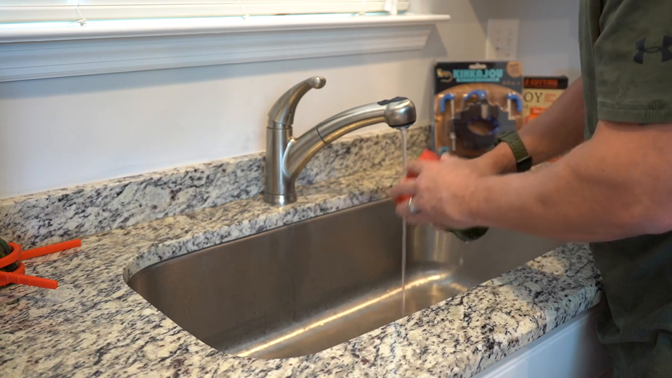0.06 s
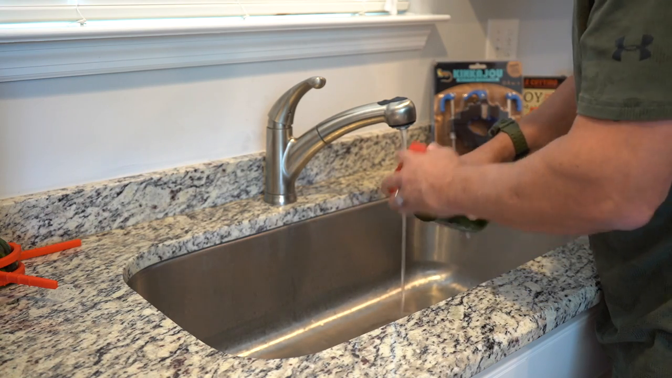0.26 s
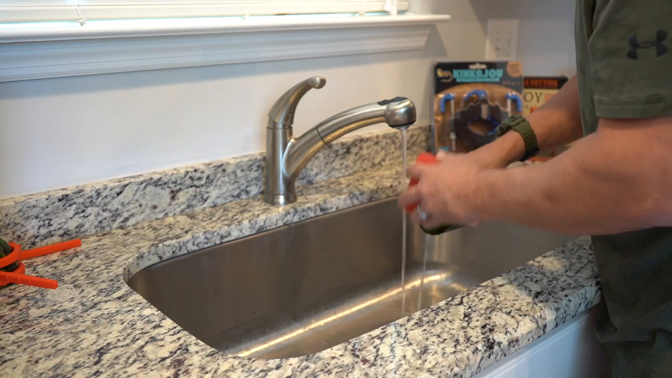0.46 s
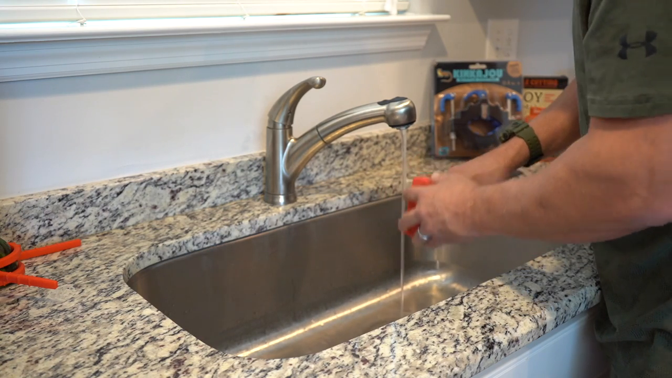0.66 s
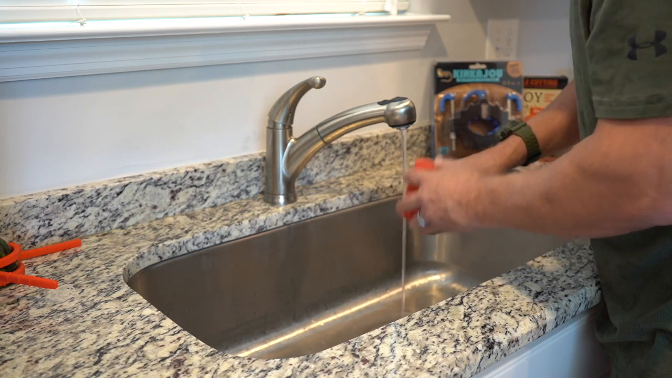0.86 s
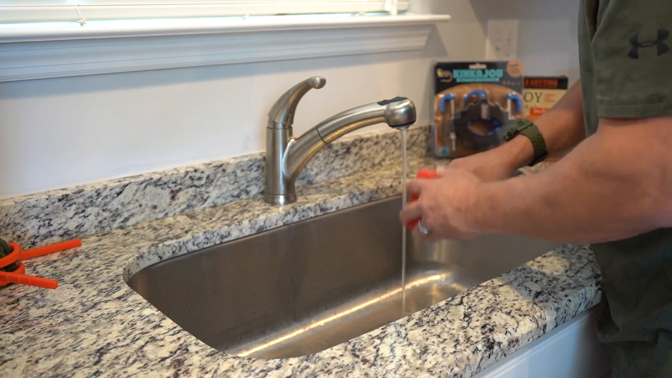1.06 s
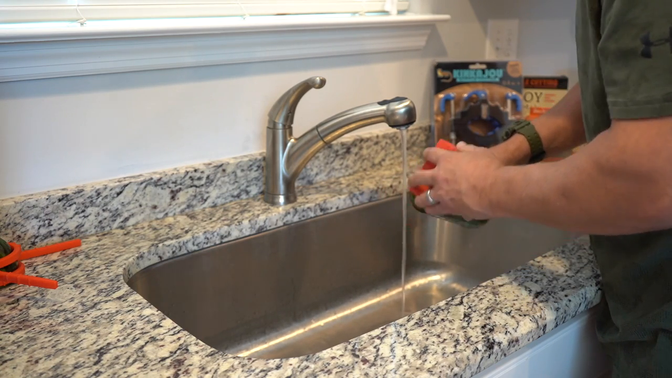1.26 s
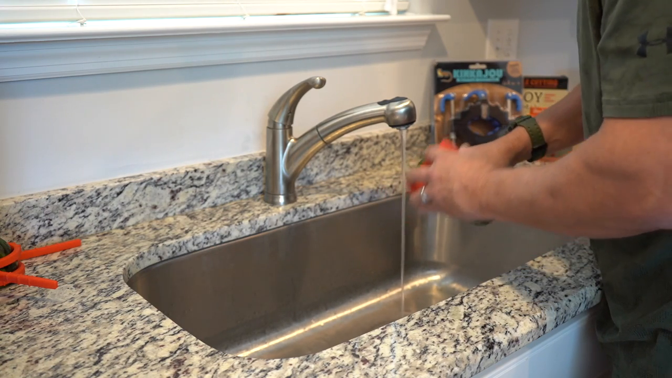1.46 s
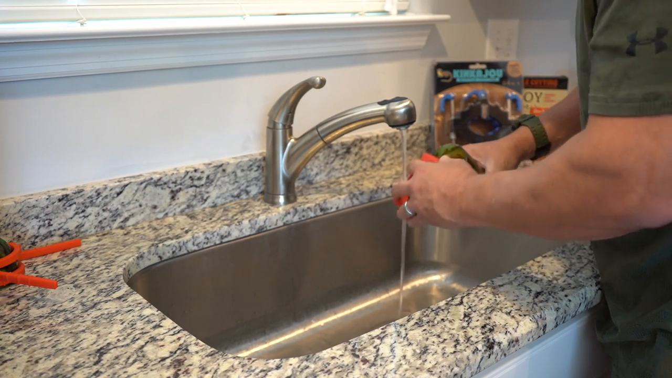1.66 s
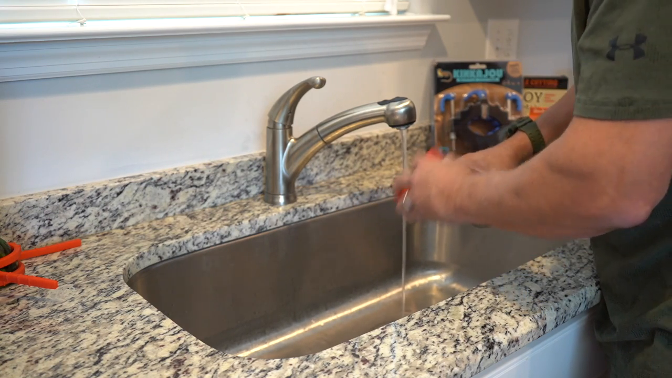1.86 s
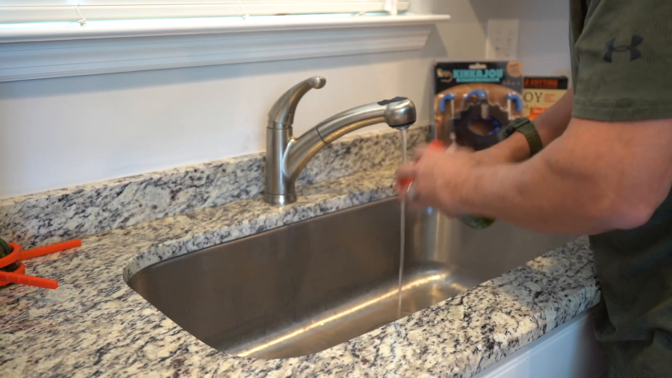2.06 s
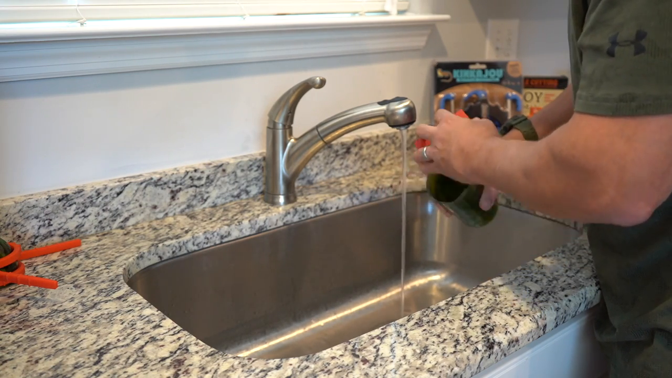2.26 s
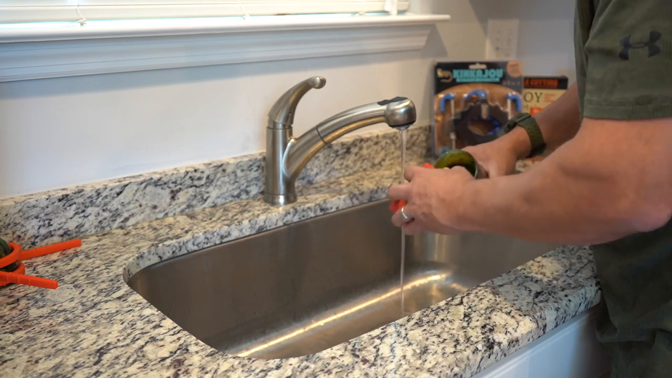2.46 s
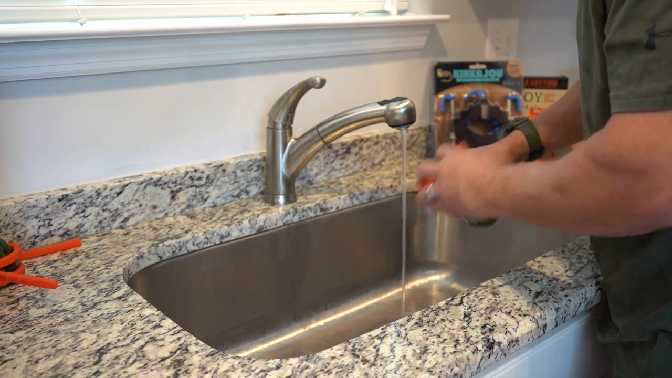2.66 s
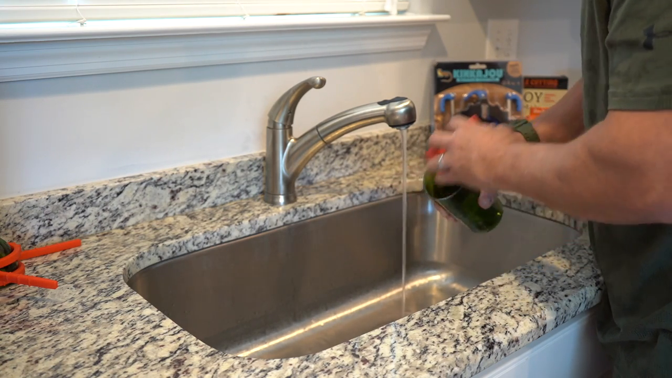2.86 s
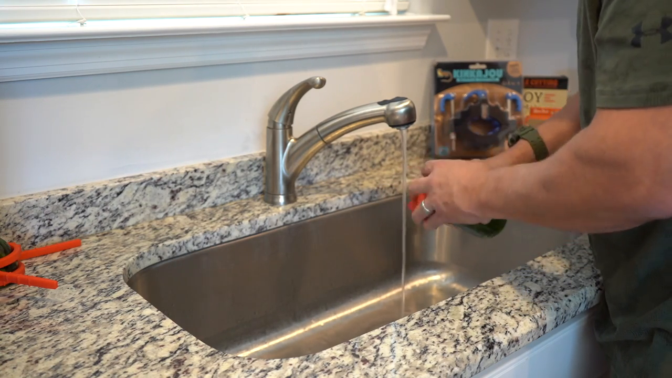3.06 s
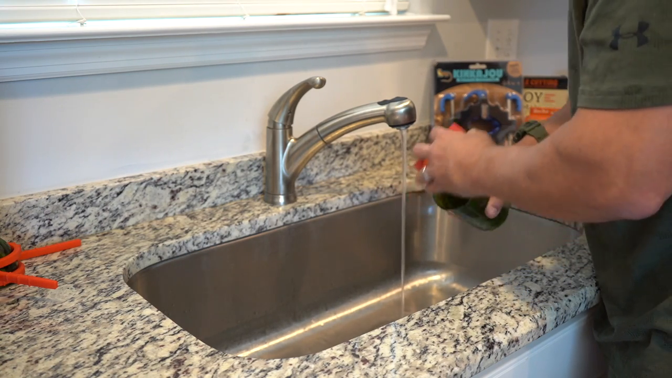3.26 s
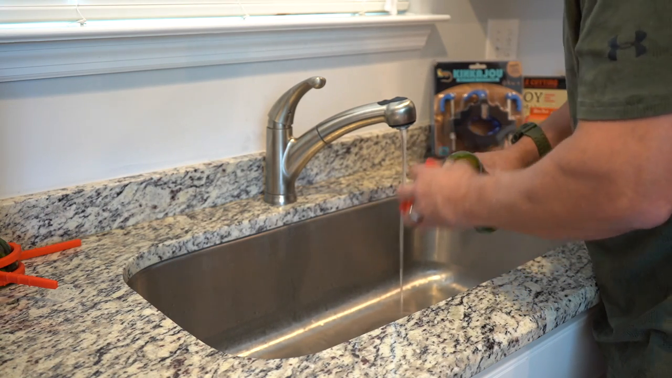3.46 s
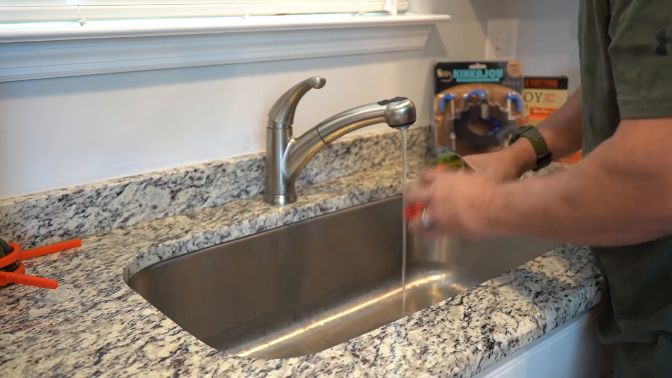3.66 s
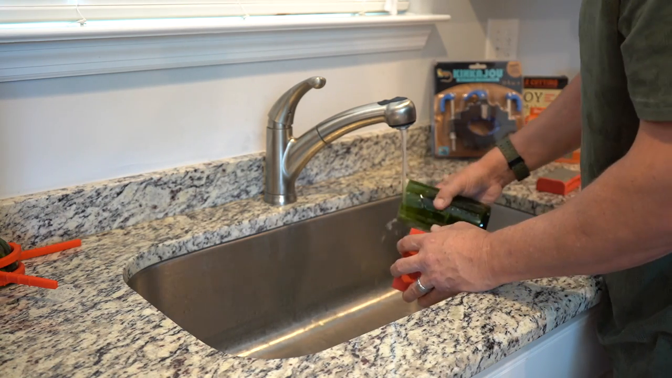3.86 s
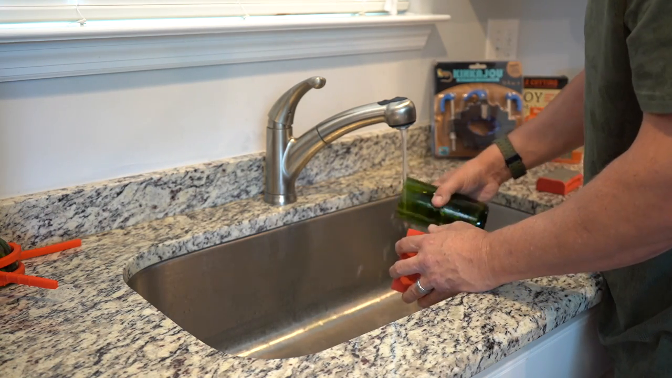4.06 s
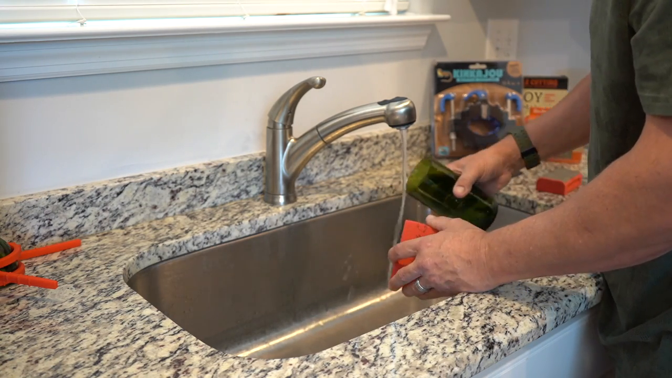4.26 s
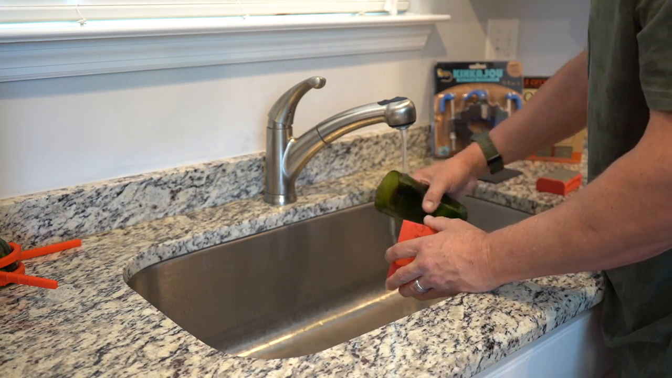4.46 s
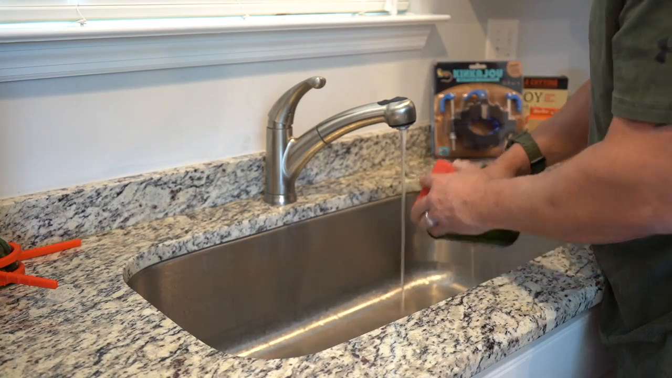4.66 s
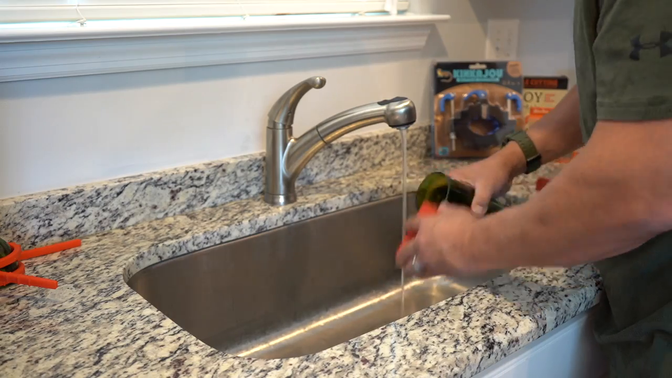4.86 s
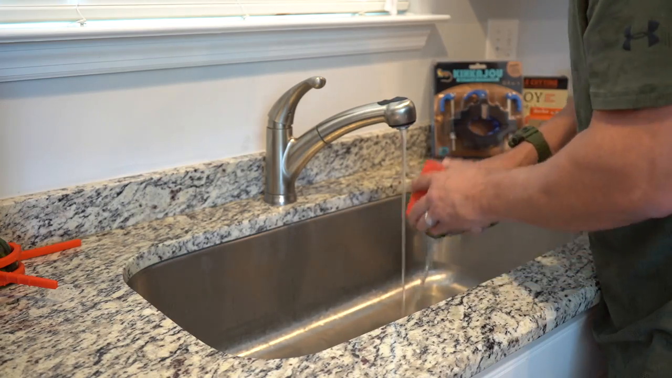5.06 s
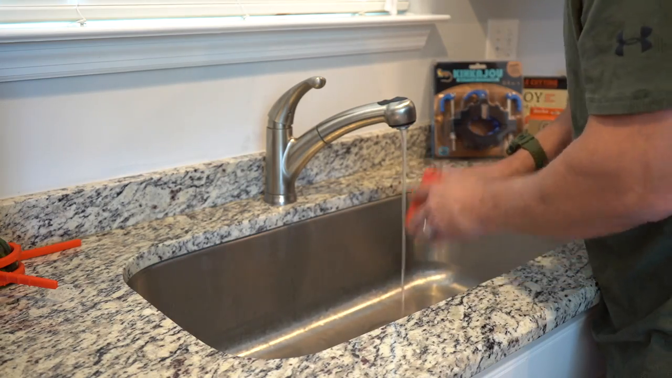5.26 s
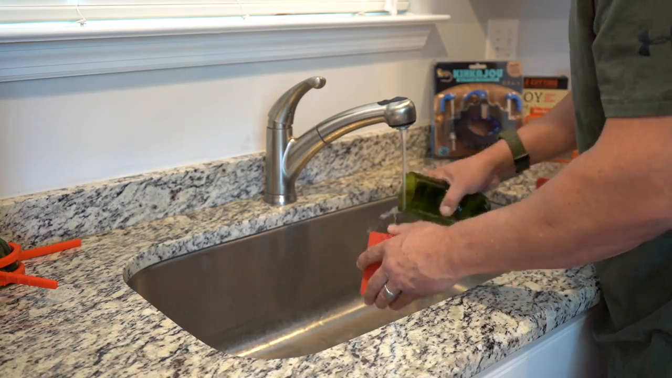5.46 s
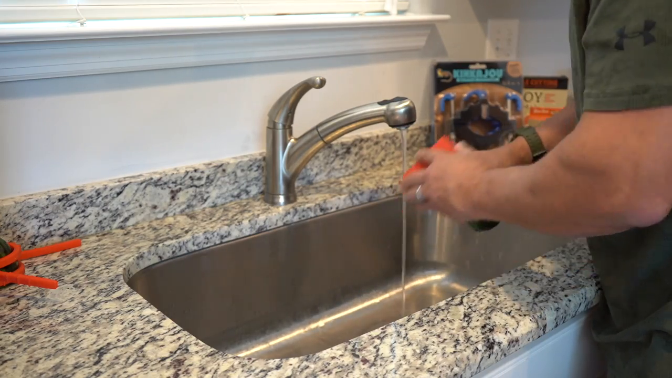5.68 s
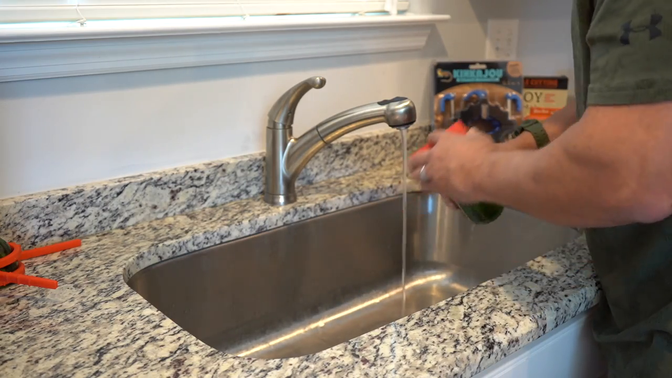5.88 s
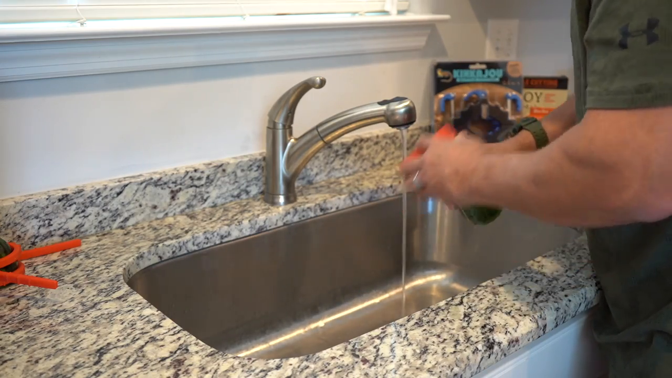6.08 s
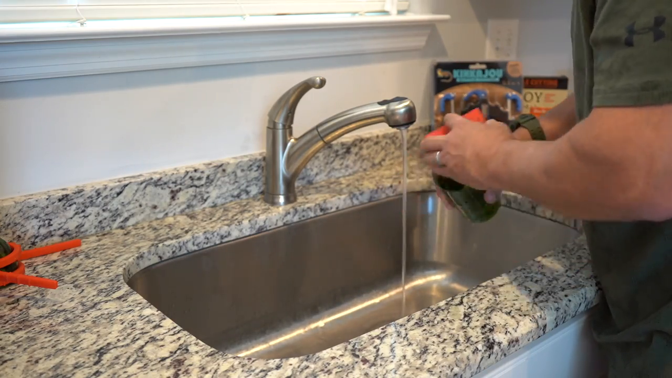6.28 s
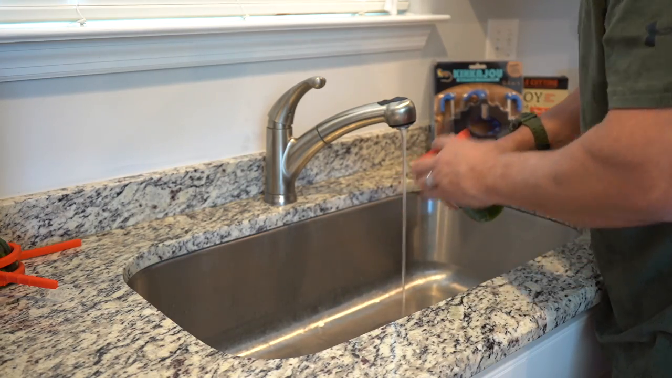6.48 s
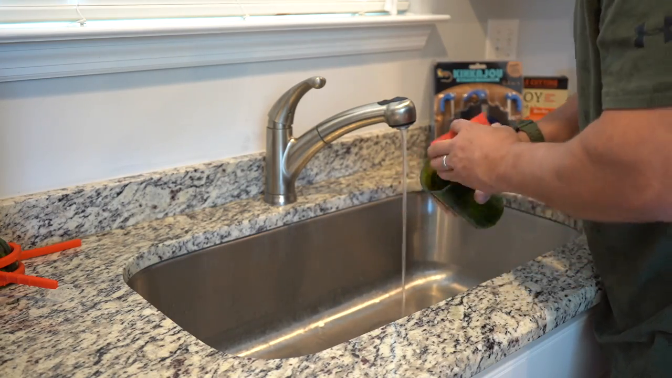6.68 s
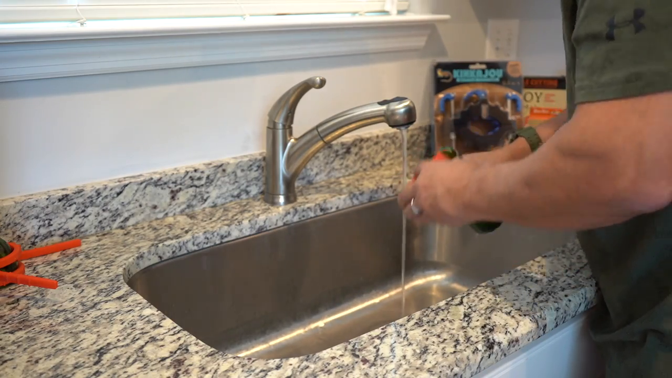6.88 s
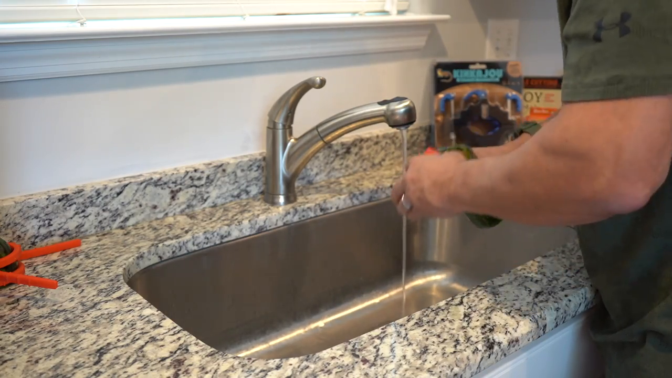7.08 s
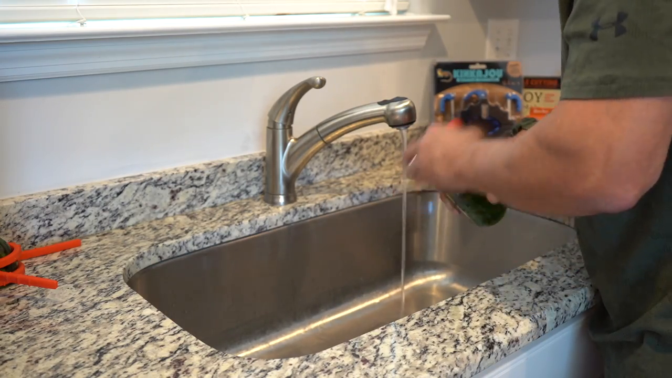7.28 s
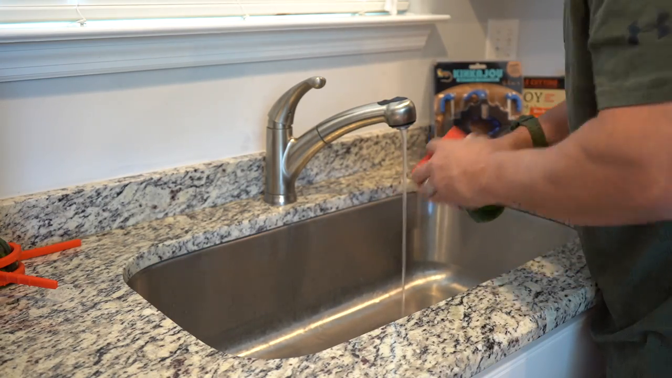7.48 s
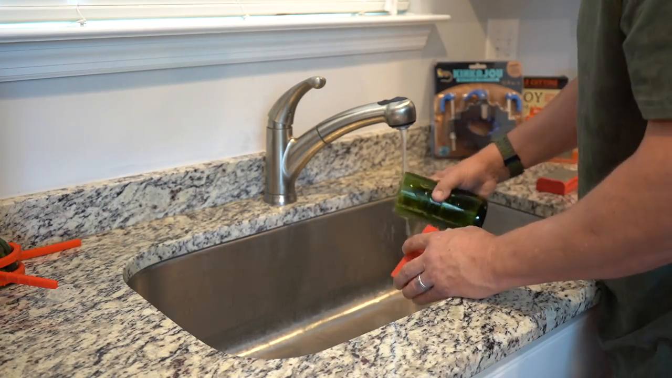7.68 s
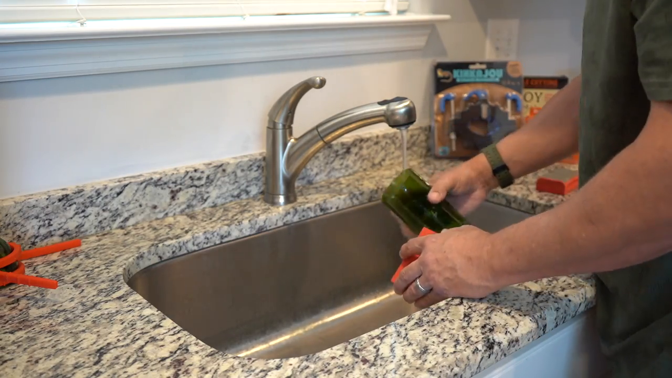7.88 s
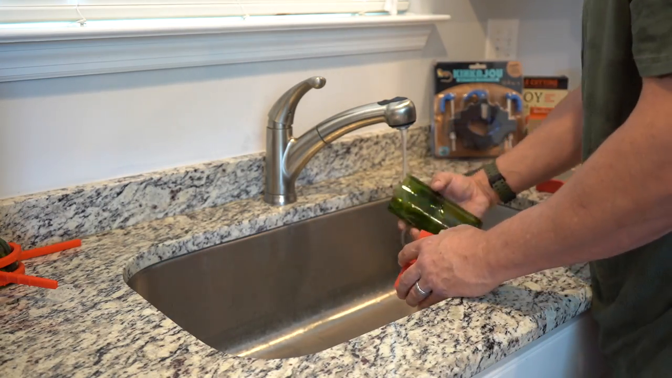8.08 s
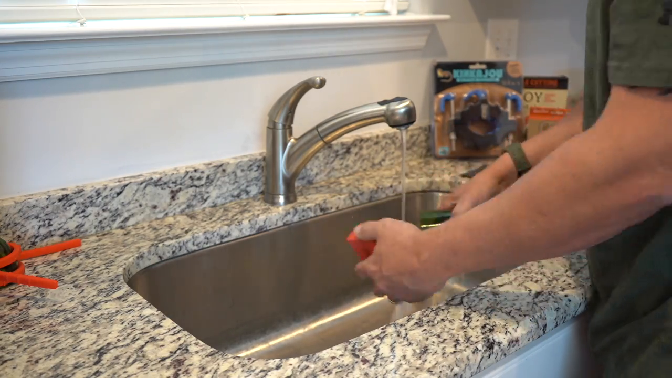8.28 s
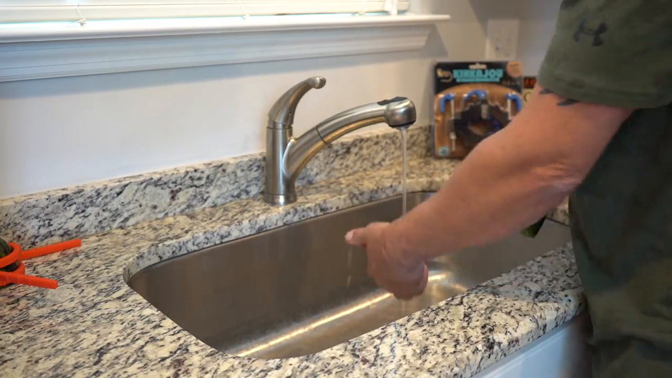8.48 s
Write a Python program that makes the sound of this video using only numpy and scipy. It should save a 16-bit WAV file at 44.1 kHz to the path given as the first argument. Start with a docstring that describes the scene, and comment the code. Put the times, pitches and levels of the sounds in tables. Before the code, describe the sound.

A close, fairly dry stereo sound at a kitchen sink, with faint low hum and room rumble throughout. A brief fuller splash of water opens it, and from about 0.1 s a wet diamond pad grinds a glass bottle rim: bright, hissy grit in a rapid judder of 30 to 44 pulses a second, with a wavering mid-high ring. Squawks stand out near 0.2, 1.0-1.3 and 2.5-3.2 s, and a knock at 3.3. At 3.75 the rasp stops; the stream swells, drumming on the steel basin, with low gulping splats and crisp drops until 4.7. Short scrapes come at 4.75-4.95 and 5.1-5.35, with water running between and a small pour at 5.5. Sanding resumes at 5.6 with a sharp squawk at 5.8, slowing slightly, with more squeaks near 7.5. It ends at 7.6; louder water drums, then heavy splats and bright droplet bursts at 8.25-8.4.

```python
"""A faint hum, a room rumble and a thin stream drumming on a steel sink are heard throughout.
Soon a wet diamond pad grinds the cut rim of a glass bottle: it sticks and slips 30 to 44 times a second,
its grit chips rasp through the bottle's resonances, and the rim's oval mode sings, scrapes and squawks.
Between strokes, when the bottle is rinsed, the stream swells; water splats on the basin and drops burst.
Noise, random clicks and gliding tones are shaped by resonances, spectra and envelopes."""
import sys
import numpy as np
from scipy import signal
from scipy.fft import rfft, irfft, next_fast_len
from scipy.io import wavfile
from scipy.ndimage import uniform_filter1d

SR = 44100
rng = np.random.default_rng(int(sys.argv[2]) if len(sys.argv) > 2 else 0)


def to_wav(sig):
    """Store sig (one row per channel, or 1-D mono) as 16-bit WAV at the path in sys.argv[1].

    Samples outside -1..1 are clipped; the rate is SR.
    """
    pcm = np.clip(np.atleast_2d(sig), -1, 1) * 32767
    pcm = np.round(pcm).astype(np.int16)
    wavfile.write(sys.argv[1], SR, pcm.T)  # frames by channels


N = 376160
TIME = np.arange(N) / SR


def from_db(db):
    """Level to amplitude: 20 dB is a factor of ten."""
    return 10 ** (np.asarray(db) / 20)


def rms_one(x):
    """Normalise to unit effective (root-mean-square) amplitude."""
    return x / np.sqrt(np.mean(abs(x) ** 2) + 1e-20)


def in_time(rows):
    """Linear interpolation: each column of a curve at every sample."""
    s, *columns = np.transpose(rows)
    return [np.interp(TIME, s, c) for c in columns]


def at_hz(points, hz):
    """Interpolate a spectrum on a log-frequency axis."""
    f, value = np.transpose(points)
    return np.interp(np.log(np.maximum(hz, 1)), np.log(f), value)


def filtered(x, order, hz, kind="low"):
    """A Butterworth filter: maximally flat in its passband."""
    return signal.sosfilt(signal.butter(order, hz, kind, fs=SR, output="sos"), x)


def drift(rate):
    """Low-passed noise: smooth chance of spread 1 with about `rate` turns a second."""
    step = 40  # samples between slow values
    r = np.exp(-2 * step * np.pi * rate / SR)
    noise = rng.standard_normal(N // step + 2002)
    slow = signal.lfilter([1], [1, -2 * r, r * r], noise)[2000:]  # skip the filter's start
    return np.interp(np.arange(N) / step, np.arange(len(slow)), rms_one(slow))


def grains(per_s, spread_db):
    """Random impulse process: two unrelated trains of clicks of uneven size and random sign; rms 1."""
    size_db = spread_db * np.minimum(rng.exponential(1, (2, N)), 4)
    sizes = from_db(size_db) * rng.choice([-1, 1], (2, N))
    return rms_one(sizes * (rng.random((2, N)) < per_s / SR))


def resonate(x, hz, width):
    """A damped oscillator: two-pole resonance with gain 1 on top; its width sets the damping."""
    r = np.exp(-np.pi * width / SR)
    zeros = np.array([1, 0, -1]) * (1 - r * r) / 2
    poles = [1, -2 * r * np.cos(2 * np.pi * hz / SR), r * r]
    return signal.lfilter(zeros, poles, x + 1e-18)


def colour(x, spectrum):
    """Spectral filtering: the gain has unit mean power, so white noise keeps its power."""
    size = next_fast_len(N)
    hz = np.arange(size // 2 + 1) * SR / size
    gain = rms_one(from_db(at_hz(spectrum, hz)))
    return irfft(rfft(x, size) * gain, size)[..., :N]


def spread(pair, likeness):
    """Interaural coherence: two unrelated sounds become left and right, as alike as the curve says."""
    size = next_fast_len(N)
    hz = np.arange(size // 2 + 1) * SR / size
    alike = np.clip(at_hz(likeness, hz), 0, 1)
    side_gain = np.sqrt((1 - alike) / (1 + alike))
    side = irfft(rfft(pair[1], size) * side_gain, size)[:N]
    return np.array([pair[0] + side, pair[0] - side])


def burst(start, rise, decay):
    """Impulsive envelope: a quick swell and an exponential fall, 1 high."""
    out, first = np.zeros(N), int(start * SR)
    age = TIME[:min(N - first, SR // 4)]
    shape = (1 - np.exp(-age / rise)) * np.exp(-age / decay)
    out[first:first + len(age)] = shape / shape.max()
    return out


def gate(start, length, attack, release):
    """Sustained envelope: straight rise, hold, exponential fall; 0-1."""
    rise = np.clip((TIME - start) / attack, 0, 1)
    return rise * np.exp(-np.maximum(TIME - start - length, 0) / release)


def sidebands(pair, width_hz):
    """Narrow-band modulation: a random swing of level and phase, width_hz to each side of a tone; rms 1."""
    return rms_one(filtered(pair[0] + 1j * pair[1], 2, width_hz))


def echoes(x, t60, wet_db):
    """Reverberation: a short diffuse tail that falls 60 dB in t60 seconds, different in each channel."""
    age = TIME[:SR // 3]
    tail = rng.standard_normal((2, len(age))) * from_db(-60 * age / t60) * (age > .001)
    tail /= np.sqrt(np.sum(tail ** 2, axis=1, keepdims=True))
    return x + from_db(wet_db) * signal.fftconvolve(x, tail, axes=1)[:, :N]


def background(hum_hz=212.6, hum_db=-68, rumble_db=-74):
    """Steady tone and band noise: an appliance hums, drifting in level, over a faint room rumble."""
    hum = np.sqrt(2) * from_db(hum_db + drift(0.58)) * np.sin(2 * np.pi * hum_hz * TIME)
    mid, side = filtered(rng.standard_normal((2, N)), 2, [70, 400], "band")
    rumble = rms_one(mid + from_db(-29) * side * [[1], [-1]])
    return rumble * from_db(rumble_db) + hum


def water_flow(trickle_db=-54, swell_share=0.58, stop_s=0.033, runoff_db=-7, runoff_s=0.78):
    """Powers of unrelated sounds add: drumming level (dB) of a trickle past the hands plus pours."""
    # the full stream reaches the basin: start_s, length_s, drumming_db
    pours = [(-.15, 0.27, -41), (3.748, 0.75, -42), (4.519, 0.19, -40.5), (5.483, 0.12, -44.5),
             (7.6, 0.91, -41)]
    power = from_db(trickle_db) ** 2
    for start, length, db in pours:
        swell = swell_share * length
        pour = gate(start, length, swell, stop_s)
        # water keeps running off bottle and hands
        runoff = from_db(runoff_db) * gate(start, length, swell, runoff_s)
        power = power + (from_db(db) * (pour + runoff)) ** 2
    return 10 * np.log10(power)


def basin(x):
    """Modal resonance: the steel floor of the sink rings and radiates little below its modes."""
    # resonances of the basin: pitch_hz, width_hz, relative_db
    floor_modes = [(432.4, 21, -7.5), (491.6, 41, -0.5), (519.3, 43, 2), (602, 43.5, -4.5),
                   (643.4, 31, -4.5)]
    rings = sum((-1) ** k * from_db(db) * resonate(x, hz, width)
                for k, (hz, width, db) in enumerate(floor_modes))
    return filtered(rings, 2, 340, "high")


def splash_ring(x, width_hz=84):
    """Impact excitation: small drops ring the higher modes of the basin; rms 1."""
    # higher modes of the basin: pitch_hz, relative_db
    high_modes = [(805, 1), (945, 2), (1045, 5.5), (1270, 3.5), (1500, 4.5), (2030, 1.5), (2400, -0.5),
                  (5280, -0.5)]
    rings = sum((-1) ** k * from_db(db) * resonate(x, hz, width_hz)
                for k, (hz, db) in enumerate(high_modes))
    return rms_one(filtered(rings, 2, 600, "high"))


def fizz(decay_s=0.0027, fizz_hz=14000, relative_db=-9.5):
    """Resonant noise pulses: tiny droplets burst at random, each a faint high tick."""
    clicks = abs(grains(per_s=72, spread_db=0)[0])
    ticks = signal.lfilter([1], [1, -np.exp(-1 / (decay_s * SR))], clicks + 1e-18)
    noise = ticks * rng.standard_normal((2, N))
    return from_db(relative_db) * rms_one(resonate(noise, fizz_hz, 2000))


def stream(spray_follow=0.35, usual_splash_db=-44, usual_pour_db=-37,
           patter_db=-6.5, whistle_hz=9400, whistle_width_hz=410, whistle_db=-11.5):
    """Random impacts excite modes: drops drum on the steel; spray and splashing grow with the drumming."""
    # low notes of the basin floor: pitch_hz, width_hz, db_against_spray
    low_notes = [(215.1, 3.2, -24.5), (235.9, 2.1, -23.5)]
    # spectrum of the spray: frequency_hz, relative_db_per_hz
    spray_spectrum = [(750, -5), (1100, -3), (2300, 0), (3500, -4), (5300, -5), (7000, -9), (15000, -12)]
    water_db = water_flow()
    above_usual_db = water_db - usual_pour_db
    impacts = grains(per_s=900, spread_db=3.0)
    drum = from_db(water_db) * rms_one(basin(impacts))
    boom = sum(from_db(db) * rms_one(resonate(resonate(impacts, hz, 2 * width), hz, 2 * width))
               for hz, width, db in low_notes)
    spray = colour(grains(per_s=14000, spread_db=1.5), spray_spectrum)
    spray = filtered(spray, 2, 450, "high")
    patter = from_db(patter_db) * splash_ring(grains(per_s=250, spread_db=4.0))
    whistle = resonate(rng.standard_normal((2, N)), whistle_hz, whistle_width_hz)
    whistle = from_db(whistle_db) * rms_one(whistle)
    # the fizz grows faster with the flow than the rest of the splashing
    splashing = spray + patter + boom + whistle + from_db(above_usual_db) * fizz()
    return drum + from_db(usual_splash_db + spray_follow * above_usual_db) * splashing


def pad_motion(bite_s=0.0013, release_s=0.02):
    """Stick-slip friction: rasp amplitude of the pad, its contact (0-1) and the running count of slips."""
    # pad on the rim: touch_s, lift_s, usual_rasp_db
    pad_strokes = [(.079, 3.748, -26.6), (4.738, 4.935, -26), (5.073, 5.348, -26.8), (5.626, 7.622, -26.4)]
    # stick-slip rate, following the pad's speed, in two spells of sanding: time_s, slips_per_s
    slip_rates = [
        [(0.08, 43.6), (0.44, 39), (1.75, 39.4), (2.11, 32.3), (2.77, 36.9), (3.75, 29.5)],
        [(4.74, 40), (5.2, 43.4), (7.06, 33.2), (7.62, 29.2)],
    ]
    rate, = in_time(np.concatenate(slip_rates))
    force, contact, cycles = np.zeros((3, N))
    for touch, lift, db in pad_strokes:
        on = gate(touch, lift - touch, bite_s, release_s)
        force, contact = force + from_db(db) * on, contact + on
        sliding = (TIME >= touch) * (TIME < lift)
        cycles = np.where(TIME >= touch, np.cumsum(rate * sliding) / SR, cycles)
    return force, contact, cycles


def per_slip(cycles):
    """Irregular friction: a clipped random value that holds for one slip."""
    return np.clip(rng.standard_normal(int(cycles.max()) + 1), -2, 2)[cycles.astype(int)]


def slip_swing(cycles):
    """Relaxation oscillation: level through the stick-slip cycle (dB); slips are unequally hard."""
    # a quick release, a sag, a stick: share_of_cycle, relative_db
    slip_shape = [(0, -1), (.14, 3.5), (.4, 1.33), (.68, -1), (.83, 1), (.93, -2), (1, -2)]
    return np.interp(cycles % 1, *np.transpose(slip_shape)) + 0.89 * per_slip(cycles)


def rim_load(light_db=-54.5, light_hz=2110, light_roughness=0.75,
             attack_s=0.037, release_s=0.027, glide_hz=94.68):
    """Loading of a resonator: each press makes the rim louder and pulls its pitch (Hz) and roughness."""
    # the hand bears down: start_s, length_s, ring_db, mid_press_pitch_hz, roughness
    hand_presses = [(0.04, 0.037, -36, 2044, 0.54), (0.302, 0.62, -42, 1998, .35),
                    (0.894, 0.16, -36, 1950, 0.53), (1.069, .25, -34.5, 1850, 0.72),
                    (1.642, 0.19, -42, 1978, 0.92), (2.136, .33, -42, 2010, 0.74),
                    (2.499, 0.29, -38.5, 1940, 0.86), (2.949, 0.36, -36, 1985, 0.59),
                    (3.499, 0.19, -42, 1960, 0.92), (4.71, 0.09, -39.5, 2290, 1.03),
                    (5.04, 0.1, -36.5, 1975, 0.22), (5.161, 0.17, -35.5, 2030, .2),
                    (5.799, 0.38, -39, 1960, 0.88), (6.291, 0.1, -40, 2030, .5),
                    (6.468, 0.29, -40.5, 2060, 0.85), (6.996, 0.25, -40.5, 1990, 0.92),
                    (7.446, 0.15, -38, 2000, .95)]
    level = np.full(N, from_db(light_db))  # the rim under a lightly held pad
    pull, grate = level * light_hz, level * light_roughness
    for start, length, db, hz, rough in hand_presses:
        press = from_db(db) * gate(start, length, attack_s, release_s)
        progress = np.clip((TIME - start) / length, 0, 1)
        level = level + press
        pull = pull + press * (hz + glide_hz * (progress - .5))  # the pitch climbs
        grate = grate + press * rough
    return level, pull / level, np.clip(grate / level, 0, 1)


def rim_ring(contact, cycles, flutter_hz=60, waver=0.61, scrape_hz=160, skirt_hz=600, skirt=0.57,
             pulse_db=1.2, sag_hz=45, chirp_hz=110):
    """Friction-driven vibration: slips pump the rim's oval mode, a wavering line or, if rough, chirps."""
    level, mean_hz, rough = rim_load()
    hard = per_slip(cycles)
    # hard slips ring louder and lower, and the pitch climbs back as the pad lets go
    pump_db = pulse_db * hard + (1.3 + rough) * (slip_swing(cycles) - 2)
    pumping = uniform_filter1d(from_db(pump_db), size=200)
    bend = uniform_filter1d(chirp_hz * (cycles % 1 - .5) - sag_hz * hard, size=200)
    sing = 1 + waver * sidebands(rng.standard_normal((2, N)), flutter_hz)
    grit = grains(per_s=2700, spread_db=0.5)
    scrape = sidebands(rng.standard_normal((2, N)), scrape_hz)
    scrape = rms_one(scrape + skirt * sidebands(grit, skirt_hz))
    mode = np.exp(2j * np.pi * np.cumsum(mean_hz + (1 + rough) / 2 * bend) / SR)
    swing = np.sqrt(1 - rough ** 2) * sing + rough * scrape
    ring = np.sqrt(2) * np.real(swing * mode)
    # the small rim radiates little below this cut
    return filtered(ring * pumping * level * contact, 6, 1480, "high")


def bumps(rise_s=0.0027, decay_s=0.015, thud_db=-9, hollow_hz=1070):
    """Cavity resonance: a dull broad knock briefly wakes the hollow of the bottle."""
    # the pad bumps the bottle's mouth: time_s, relative_db
    mouth_knocks = [(.076, -43), (.215, -40), (1.675, -38.5), (3.288, -34), (4.737, -37), (5.075, -37),
                    (5.144, -36), (5.622, -34.5)]
    push = sum(from_db(db) * burst(s, rise_s, decay_s) for s, db in mouth_knocks)
    hollow = np.sin(2 * np.pi * np.cumsum(hollow_hz + 35 * drift(300)) / SR)
    thud = rms_one(filtered(rng.standard_normal(N), 2, [800, 1700], "band"))
    return push * (hollow + from_db(thud_db) * thud) / np.sqrt(2)


def rasp(force, cycles, shift_db=3.4, patchy_db=2.0, direct_db=0.91):
    """Brittle fracture: diamond grit chips the glass, heard directly and through the bottle's resonances."""
    # the grit bites harder for an instant: time_s, extra_db
    hard_bites = [(1.75, 2.5), (2.492, 0), (3.429, 9.5), (5.777, 4.5), (6.492, 4.5), (7.615, 5)]
    # grit on glass: frequency_hz, relative_db_per_hz
    grit_spectrum = [(1100, -27.5), (2400, -12.5), (3700, -15), (4800, -11.5), (5800, -8), (8500, -6.5),
                     (11000, -4), (13500, 0), (15500, 0)]
    # other resonances of the bottle: pitch_hz, width_hz, mean_level_db
    bottle_modes = [(1050, 25, -63.5), (2420, 13, -55.5), (5450, 150, -54), (5710, 250, -53),
                    (6930, 110, -53), (7470, 50, -57.5), (10310, 290, -49.5), (15500, 380, -41.5)]
    bite_db = sum(db * burst(s, 0.0025, 0.0077) for s, db in hard_bites)
    chip_db = slip_swing(cycles) + bite_db + 1.03 * drift(97)
    chips = grains(per_s=20000, spread_db=0.5) * force * from_db(chip_db)
    direct = colour(chips, grit_spectrum)
    # as the contact travels round the rim, each slip favours other resonances
    patches = sum((from_db(patchy_db * per_slip(cycles)) - 1) * resonate(direct, hz, 780)
                  for hz in np.geomspace(5500, 15000, 7))
    direct = direct + patches
    glass = sum(from_db(db + shift_db * drift(2)) * rms_one(resonate(chips, hz, width))
                for hz, width, db in bottle_modes)
    return filtered(from_db(direct_db) * direct + glass, 3, 800, "high")


def squeaks(width_share=0.033, attack_s=0.0087, release_s=0.016):
    """Resonant noise: the grit catches a high mode of the glass; narrow rough bands flare up and fade."""
    # squeaks: start_s, length_s, level_db, pitch_hz
    caught_modes = [(.12, 0.086, -39, 5760), (0.373, 0.087, -40, 5460), (3.072, 0.24, -40, 5890),
                    (4.738, 0.17, -33, 13800), (.6, .7, -45.5, 5410), (6.472, 0.18, -42, 6800)]
    out = np.zeros((2, N))
    for start, length, db, hz in caught_modes:
        first, width = int(start * SR), width_share * hz
        part = slice(first, first + SR // 2)
        ring = resonate(resonate(rng.standard_normal((2, SR // 2)), hz, width), hz, width)
        out[:, part] += from_db(db) * rms_one(ring) * gate(start, length, attack_s, release_s)[part]
    return out


def snags(jitter_hz=65, sag_hz_per_db=15, chirp_hz_per_s=3500, light_hz=1997, light_db=-35.5,
          rise_s=0.0033, decay_s=0.011, scuff_db=-7):
    """Friction loading: harder snags pull the rim lower; it squawks, climbing free, in a grainy scuff."""
    # the pad snags: time_s, relative_db
    pad_catches = [(0.222, -22), (1.005, -25.5), (1.05, -28), (1.101, -32), (1.181, -23), (1.26, -23),
                   (1.283, -25.5), (2.523, -28), (2.576, -23.5), (2.622, -28.5), (2.738, -29),
                   (2.927, -22.5), (3.04, -28), (3.097, -24.5), (3.15, -26), (3.624, -26), (5.801, -18),
                   (6.126, -23.5), (7.03, -29), (7.141, -27), (7.475, -21.5), (7.522, -26.5),
                   (7.587, -29.5)]
    out, age = np.zeros(N), TIME[:SR // 10]
    shape = burst(0, rise_s, decay_s)[:len(age)]
    pitch = light_hz + jitter_hz * drift(370)
    scuff = rms_one(filtered(grains(per_s=3700, spread_db=0.0)[0], 3, [1550, 2400], "band"))
    for s, db in pad_catches:
        part = slice(int(s * SR), int(s * SR) + len(age))
        hz = pitch[part] - sag_hz_per_db * (db - light_db) + chirp_hz_per_s * (age - decay_s)
        squawk = np.sin(2 * np.pi * np.cumsum(hz) / SR)
        out[part] += from_db(db) * shape * (squawk + from_db(scuff_db) * scuff[part]) / 2
    return out


def splats(rise_s=0.0037, decay_s=0.016, gulp_hz=535.4, waver_hz=34.47):
    """Impact of water lumps spilling from bottle and hands: a low gulp and a shower of drops."""
    # heavy splats on the basin: time_s, thud_db, splash_db
    water_lumps = [(3.884, -36, -60), (4.094, -29, -47), (4.152, -30.5, -47), (4.362, -28.5, -44),
                   (4.435, -44, -41), (4.680, -26.5, -47), (7.711, -34, -47), (8.258, -27.5, -43.5),
                   (8.343, -24.5, -45)]
    thud, shower = np.zeros((2, N))
    for s, db, splash_db in water_lumps:
        shape = burst(s, rise_s, decay_s)
        thud, shower = thud + from_db(db) * shape, shower + from_db(splash_db) * shape
    gulp = np.sin(2 * np.pi * np.cumsum(gulp_hz + waver_hz * drift(98)) / SR)
    gulp = filtered(thud * gulp, 4, 420, "high")
    return gulp + shower * splash_ring(grains(per_s=3000, spread_db=1.0)[0])


def drops(width_hz=2200, decay_s=0.0062):
    """Transient resonance: drops burst with a short bright spit of decaying noise."""
    # bursting drops: time_s, level_db, pitch_hz
    drop_bursts = [(4.133, -32, 14000), (4.168, -33, 13500), (4.3725, -26, 14200), (4.4389, -27, 12800),
                   (8.059, -27, 15000), (8.1534, -29.5, 12300), (8.281, -23, 13000), (8.379, -19.5, 11100),
                   (8.389, -18, 11200)]
    out, age = np.zeros((2, N)), TIME[:SR // 30]
    for s, db, hz in drop_bursts:
        noise = rng.standard_normal((2, len(age))) * np.exp(-age / decay_s)
        spit = resonate(noise, hz, width_hz)
        first = int(s * SR)
        out[:, first:first + len(age)] += (from_db(db) * spit / abs(spit).max())[:, :N - first]
    return out


def scene():
    """Superposition: sanding a little to the right, reflected by basin and wall; rim in the middle."""
    # how firmly the grit cuts: time_s, db_above_usual
    cutting = [(.26, 2.4), (.6, -1.6), (1.25, 2), (1.9, 0.3), (3.28, 0.5), (3.34, -0.5), (4.8, 1),
               (5.8, 0.8), (6.7, -0.1)]
    # left-right likeness (0-1) of sanding and drops, then of the stream: frequency_hz, likeness
    rasp_likeness = [(3500, 1), (5500, 0.66), (8000, 0.52), (14000, 0.25)]
    water_likeness = [(2000, 1), (3500, 0.85), (14000, 0)]
    water = spread(stream(), water_likeness)
    force, contact, cycles = pad_motion()
    ringing = rim_ring(contact, cycles) + bumps() + snags()
    firmness_db, = in_time(cutting)
    grit = rasp(force * from_db(firmness_db), cycles) + contact * squeaks()
    near = echoes(grit + drops(), t60=0.059, wet_db=-12)
    sanding = spread(near, rasp_likeness) * from_db([[-.85], [.05]])  # left, right
    return background() + water + ringing + sanding + splats()


def record(dry):
    """Low-pass filtering: an elliptic filter cuts the top steeply above 15800 Hz."""
    return signal.sosfilt(signal.ellip(12, .2, 80, 15800, fs=SR, output="sos"), dry)


dry = scene()
out = record(dry)
to_wav(out)
```